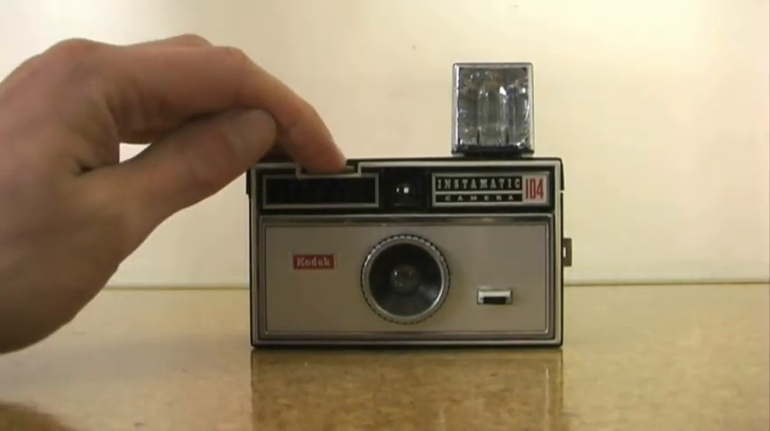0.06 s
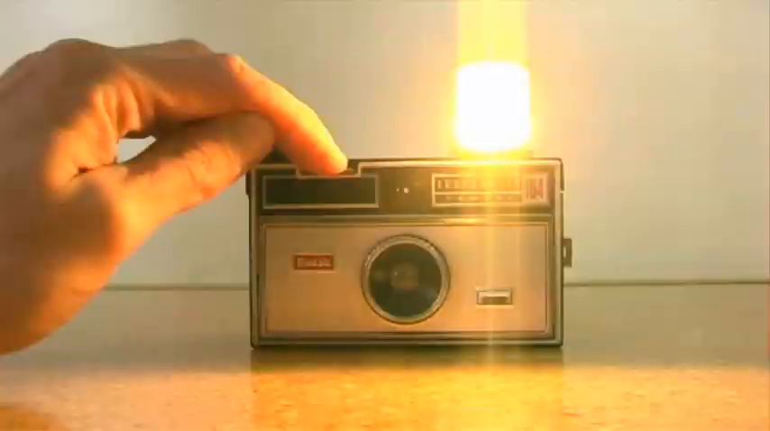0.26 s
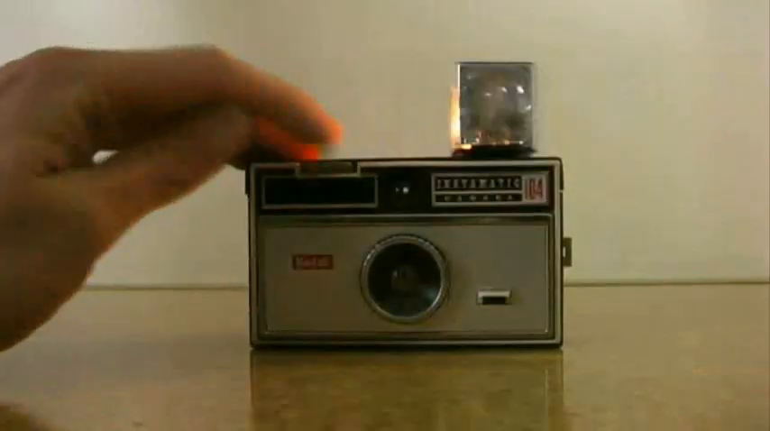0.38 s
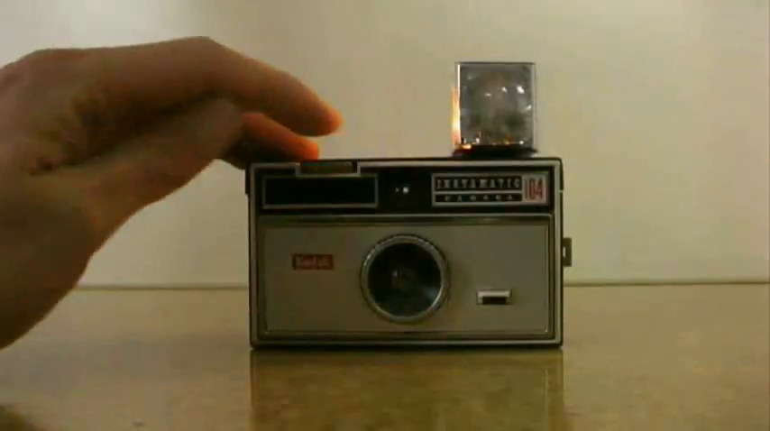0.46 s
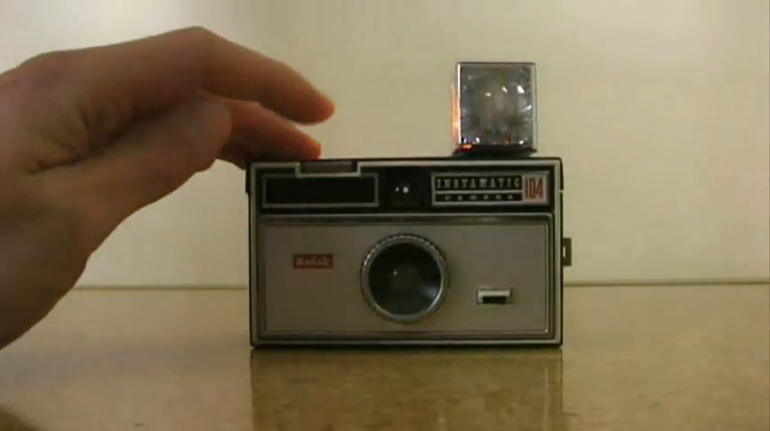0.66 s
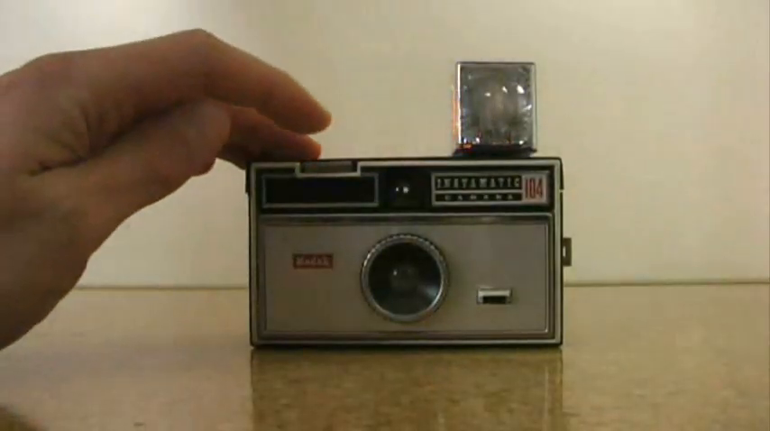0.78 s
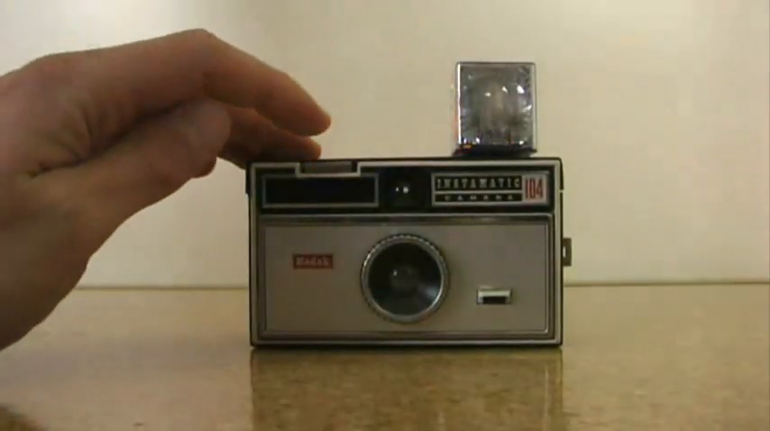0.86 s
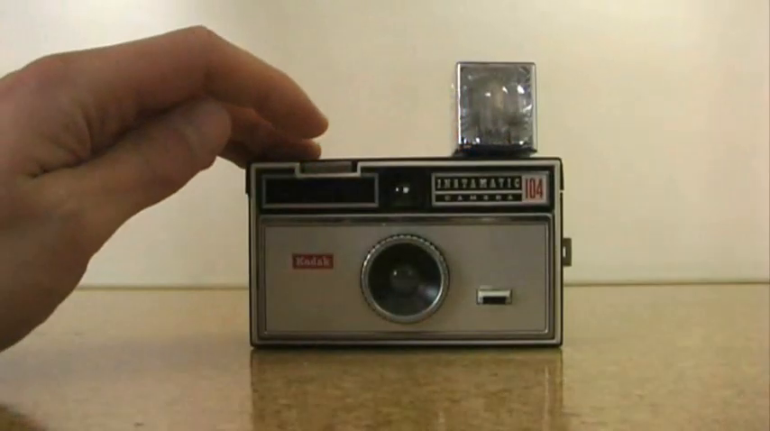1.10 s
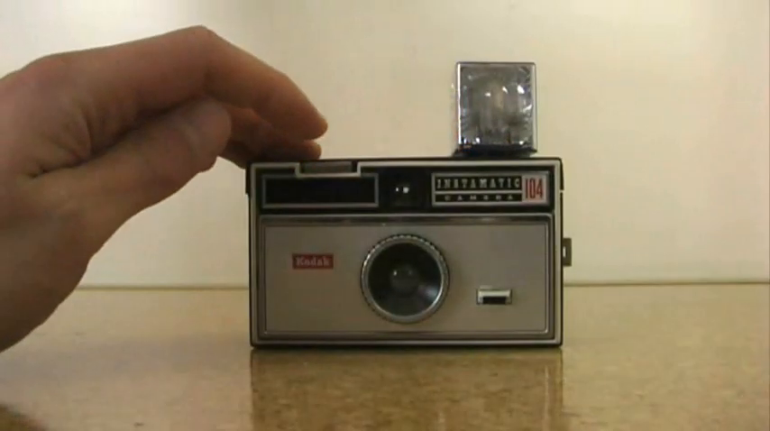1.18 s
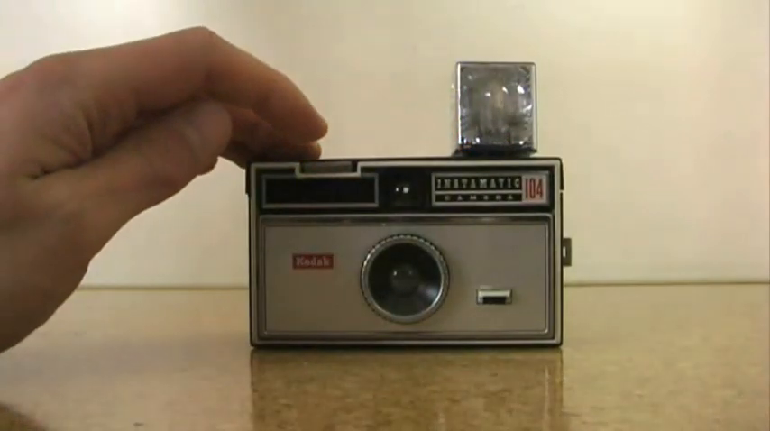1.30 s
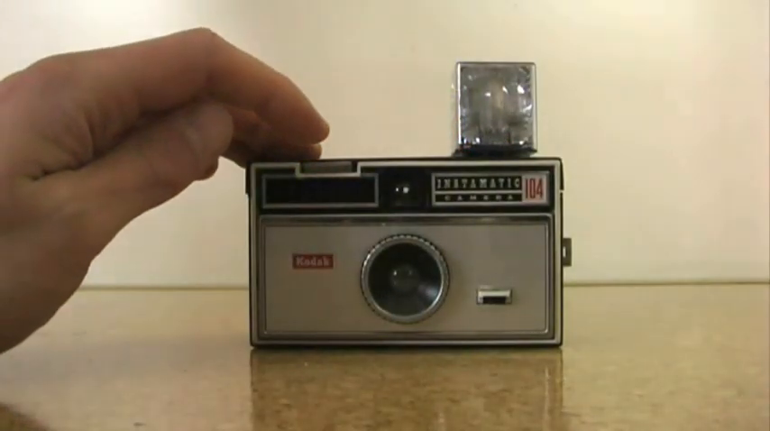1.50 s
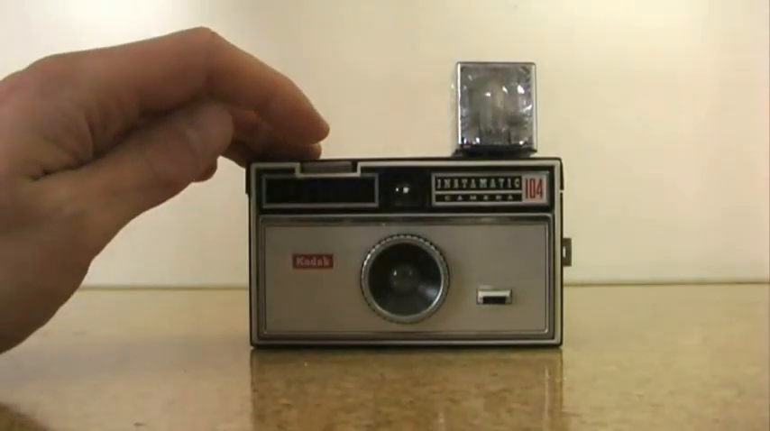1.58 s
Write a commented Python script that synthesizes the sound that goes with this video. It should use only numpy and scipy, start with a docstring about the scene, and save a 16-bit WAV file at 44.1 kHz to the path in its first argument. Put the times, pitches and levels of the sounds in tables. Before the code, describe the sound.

Two quick, sharp clicks of a small camera's shutter in a quiet room.

```python
"""A small plastic camera sits on a stone tabletop in a quiet room, close to the microphone.
First, fingers tick faintly on the case over a low hiss. Then the shutter snaps and a flashcube
fires with a soft puff. A fifth of a second later the release springs back with a ringing rattle.
Each snap thumps through the table and echoes in the room. Last come a few more ticks and a dull
knock as the hand nudges the camera."""
import sys
import numpy as np
from scipy import signal
from scipy.fft import rfft, irfft, next_fast_len
from scipy.io import wavfile

SR = 44100
rng = np.random.default_rng(int(sys.argv[2]) if len(sys.argv) > 2 else 0)


def digitize_waveform(pressure):
    """Quantize a signal to 16-bit integers and store it at the path in sys.argv[1].

    Rows of a 2-D input are taken as channels; values are limited to [-1, 1].
    """
    field = np.atleast_2d(pressure).T
    bounded = np.clip(field, -1, 1)
    quanta = np.round(bounded * 32767).astype(np.int16)
    wavfile.write(sys.argv[1], SR, quanta)


N = 72765
TIME = np.arange(N) / SR

# The blade's blows. Each row: peak time in seconds, level in dB, rise and fade in seconds, then bass,
# treble, ring and thump in dB. A rise or a fade is the time a sound takes to change by 60 dB.
SHUTTER_BLOWS = [(.2362, -5.5, 0.0053, 0.0097, -2.5, 3, -6.5, -33),
                 (.2452, -10, .011, 0.012, 4, 2.5, 0.5, -33.5),
                 (.2468, -9, 0.0049, 0.0086, -1, 0, -25, -42),
                 (.2659, -15.5, 0.014, 0.031, -45, -3, -8, -50)]
# The tone of those blows. Each row: frequency in Hz, level in dB.
SHUTTER_TONE = [(30, -36), (70, -27.5), (350, -16.5), (550, -6), (750, -12.5), (1100, -2.5), (1400, 2),
                (1900, -2), (2300, -7), (2900, -5), (3700, -9), (5200, -13), (7500, -12), (10400, -8),
                (12500, -13.5), (15800, -17)]
# The notes the shutter rings with. Each row: pitch in Hz, level in dB, fade in seconds.
SHUTTER_NOTES = [(565, -20, .08), (1058, -18, .05), (1315, -15, .06), (1420, -11, .05), (1750, -19, .04),
                 (1970, -22, .09), (2767, -25, .15), (3242, -26, .08), (10576, -22, .02)]

def shutter():
    """The shutter blade trips, hits its stop, bounces and closes."""
    return snap(SHUTTER_BLOWS, SHUTTER_TONE, SHUTTER_NOTES)


# The release's blows, tone and ringing notes. The rows read like those of the shutter's three tables.
RELEASE_BLOWS = [(0.4467, -12.5, 0.013, 0.033, 0.45, 1.5, 1, -33),
                 (0.4512, -13, 0.0031, .013, -1.7, 10.5, -32, -69),
                 (0.4726, -15, 0.022, 0.035, 1, 1.5, -26, -54),
                 (0.4786, -22, 0.012, 0.086, 1.1, 2, -2.5, -44)]
RELEASE_TONE = [(30, -54), (70, -17.5), (200, -15), (420, -12.5), (600, -17), (900, -11.5), (1380, -5.5),
                (1800, -5), (2500, -1.5), (3200, -5), (3900, -5.5), (4900, -12.5), (6200, -9.5),
                (7400, -17.5), (9300, -14), (12500, -21.5), (15800, -18.5)]
RELEASE_NOTES = [(1152, -32, .65), (1410, -15, .07), (1701, -16, .04), (1945, -19, .07), (2190, -18, .05),
                 (2485, -24, .18), (2760, -24, .22), (3062, -25, .28), (3165, -17, .18), (3232, -14, .11),
                 (3360, -16, .07), (4655, -20, .08), (5872, -22, .13), (6265, -20, .04)]

def release():
    """The release lever and the flashcube's socket spring back and rattle."""
    return snap(RELEASE_BLOWS, RELEASE_TONE, RELEASE_NOTES)


def snap(blows, tone, notes, bass_hz=1200, treble_hz=6000, case_db=-14, case_fade_s=0.063):
    """Each blow is a burst of tiny contacts; the loose case chatters on and the struck part rings."""
    contacts, ringing = np.zeros(N), np.zeros(N)
    for when, db, rise, fade, bass_db, treble_db, ring_db, _ in blows:
        chatter = from_db(case_db) * swell(when, rise, case_fade_s)
        burst = np.hypot(swell(when, rise, fade), chatter) * rng.choice([-1., 1.], N)
        tilt = [(bass_hz / 2, bass_db), (bass_hz * 2, 0), (treble_hz / 2, 0), (treble_hz * 2, treble_db)]
        contacts += from_db(db) * shape_tone(burst, tilt, keep_power=False)
        ringing += from_db(db + ring_db) * ring(when, notes)
    return shape_tone(contacts, tone) + ringing


# The spring's chirps. Each row: peak time in seconds, level in dB, pitch in Hz, rise and fade in seconds.
SPRING_CHIRPS = [(0.4484, -8.5, 3230, 0.01, 0.017), (0.4788, -19, 3120, 0.023, 0.027)]

def spring():
    """The spring gives two short, nearly pure chirps as it slides home."""
    return sum(from_db(db) * swell(when, rise, fade) * np.sin(2 * np.pi * hz * (TIME - when))
               for when, db, hz, rise, fade in SPRING_CHIRPS)


# The deep tone of a jolt. Each row: frequency in Hz, level in dB.
THUMP_TONE = [(25, -2), (60, -0.5), (110, 0), (210, 0), (330, -5), (700, -4.5), (1100, -23), (2200, -35)]

def table_thumps(blows, rise_s=0.0065, fade_s=0.034):
    """Each blow jolts the microphone through the table, more strongly on the right."""
    loudness = sum(from_db(thump_db) * swell(when, rise_s, fade_s) for when, *_, thump_db in blows)
    jolts = loudness * rng.choice([-1., 1.], (2, N))
    return shape_tone(jolts, THUMP_TONE) * from_db([[-4.5], [4.5]])


# The tone of the puff. Each row: frequency in Hz, level in dB.
FLASH_TONE = [(250, -50), (400, -7), (520, -1), (750, 0.5), (1100, 7.5), (1450, -12.5), (2200, -0.5),
              (6000, -44)]

def flash():
    """The bulb burns out with a soft puff that fades away."""
    puff = shape_tone(rng.standard_normal(N), FLASH_TONE)
    return from_db(-39.5) * swell(when=.262, rise=.03, fade=0.75) * puff


# Light taps. Each row: peak time in seconds, level in dB, pitch in Hz, rise and fade in seconds,
# bright edge in dB.
FINGER_TICKS = [(0.051, -44.5, 1460, 0.0024, 0.036, -9.5), (0.136, -46.5, 1480, 0.0046, 0.06, -5.5),
                (.219, -46.5, 1810, 0.014, 0.081, -5), (.440, -35.5, 1300, 0.0084, 0.11, -12),
                (0.7764, -46.5, 1500, .004, 0.025, 1), (1.216, -44, 865, .001, 0.068, -16),
                (1.31, -50.5, 980, 0.025, 0.062, -14), (1.530, -44, 1020, 0.0027, 0.072, -22),
                (1.551, -43, 1670, .005, 0.058, -11), (1.594, -44.5, 600, .001, 0.07, -20)]
# The notes of the knock. Each row: pitch in Hz, level in dB, fade in seconds.
KNOCK_NOTES = [(135, -51, 0.18), (226, -39, 0.089), (414, -52, .03), (2370, -43, 0.042)]

def fingers(edge_hz=11000, band_ratio=1.49):
    """Fingers and button tick on the case, and the hand nudges the camera with one dull knock."""
    out = ring(when=1.593, notes=KNOCK_NOTES)
    for when, db, hz, rise, fade, edge_db in FINGER_TICKS:
        noise = rng.standard_normal((2, N))
        body = unit_power(passband(noise[0], [hz / band_ratio, hz * band_ratio], "band"))
        edge = from_db(edge_db) * unit_power(passband(noise[1], edge_hz, "low"))
        out += from_db(db) * swell(when, rise, fade) * (body + edge)
    return out


# The tone of the echoes. Each row: frequency in Hz, level in dB.
ROOM_TONE = [(100, 0), (300, -6), (550, 5.5), (1200, 0), (2700, 2.5), (5000, 5), (9000, -3), (15000, -3.5)]
# How long they last. Each row: frequency in Hz, fade in seconds.
ROOM_FADE = [(200, 0.63), (550, 0.5), (1400, 0.56), (3000, 0.44), (6000, 0.4), (10000, 0.4), (15000, 0.42)]
# How wide they sound. Each row: frequency in Hz, level of the sides against the middle in dB.
ROOM_WIDTH = [(100, -11), (600, -14.5), (3000, -11), (7000, -10), (13000, -22)]

def room(sound, onset_s=0.01):
    """The room answers with a wash of echoes; each band of pitches dies away at its own speed."""
    edges_hz, tail = np.geomspace(60, 18000, 15), 0
    noise = rng.standard_normal((2, 2, N))
    for band, (low, high) in enumerate(zip(edges_hz, edges_hz[1:])):
        hz = np.sqrt(low * high)
        mid, side = passband(noise[band % 2], [low, high], "band")
        wash = stereo(mid, from_db(at_hz(ROOM_WIDTH, hz)) * side)
        loudness = from_db(at_hz(ROOM_TONE, hz)) * swell(onset_s, 2 * onset_s, at_hz(ROOM_FADE, hz))
        tail += loudness * wash
    return signal.fftconvolve(sound[None], unit_power(tail) / np.sqrt(N), axes=1)[:, :N]


# How the hand's rumble grows near the end. Each row: time in seconds, level in dB.
RUMBLE_LEVELS = [(0, -83), (1.3, -88), (1.44, -62), (1.53, -63), (1.65, -64)]
# Its tone. Each row: frequency in Hz, level in dB.
RUMBLE_TONE = [(25, -20), (50, -4), (110, -3), (230, -12.5), (600, -25.5), (2000, -42)]

def hand_rumble():
    """The shifting hand makes a low rumble."""
    level_db = np.interp(TIME, *np.transpose(RUMBLE_LEVELS))
    return from_db(level_db) * shape_tone(rng.standard_normal(N), RUMBLE_TONE)


# The tone of the hiss. Each row: frequency in Hz, level in dB.
HISS_TONE = [(15, -31.5), (25, -4), (69, -1.5), (164, -5.5), (253, -6), (313, -6), (349, -13.5),
             (445, -5.5), (567, -8), (703, -8), (782, -0.5), (945, -4.5), (1200, -7.5), (1660, -6.5),
             (2170, -9), (2850, -3), (4500, -14.5), (6730, -18), (7700, -14.5), (8350, -16), (15500, -23)]
# How wide it sounds. Each row: frequency in Hz, level of the sides against the middle in dB.
HISS_WIDTH = [(30, -9.5), (70, -13), (200, -3), (1000, -3.5), (4000, -5.5), (10000, -3.5)]
# Thin whines in the hiss. Each row: pitch in Hz, level in dB, width in Hz.
HISS_WHINES = [(935, -75, 48), (1679, -69.5, 71), (2900, -68.5, 21), (3160, -76, 190), (7840, -72, 400)]

def background(hiss_db=-57, hum_hz=146.6, hum_db=-71.5):
    """A steady hiss with a faint hum and whines."""
    mid, side = rng.standard_normal((2, N))
    side = shape_tone(side, HISS_WIDTH, keep_power=False)
    out = from_db(hiss_db) * shape_tone(stereo(mid, side), HISS_TONE)
    out += from_db(hum_db) * unit_power(np.sin(2 * np.pi * hum_hz * TIME))
    for hz, db, width in HISS_WHINES:
        whine = passband(rng.standard_normal(N + SR), [hz - width / 2, hz + width / 2], "band")
        out += from_db(db) * unit_power(whine[SR:])  # skip a second while the filter settles
    return out


def swell(when, rise, fade):
    """A loudness curve that climbs to its peak at `when`, then dies away."""
    return from_db(-60 * np.maximum((when - TIME) / rise, (TIME - when) / fade).clip(0, 5))


def ring(when, notes):
    """A struck part rings with pure notes that fade."""
    age = np.maximum(TIME - when, 0)
    return sum(from_db(db) * swell(when, 1, fade) * np.sin(2 * np.pi * hz * age)
               for hz, db, fade in notes)


def shape_tone(sound, tone, keep_power=True):
    """Filter a sound by a tone table; keep_power leaves white noise as strong as it was."""
    size = 2 * next_fast_len(N)
    gain = from_db(at_hz(tone, np.fft.rfftfreq(size, 1 / SR)))
    cepstrum = irfft(np.log(unit_power(gain) if keep_power else gain))
    # Fold the second half onto the first, so the filter never sounds ahead of a blow.
    cepstrum[1:size // 2] *= 2
    cepstrum[size // 2 + 1:] = 0
    return irfft(rfft(sound, size) * np.exp(rfft(cepstrum)))[..., :N]


def at_hz(table, hz):
    """Read between a table's rows, giving each octave equal space."""
    frequencies, values = np.transpose(table)
    return np.interp(np.log(np.maximum(hz, 1)), np.log(frequencies), values)


def passband(sound, hz, kind):
    """Let only some frequencies through."""
    return signal.sosfilt(signal.butter(2, hz, kind, fs=SR, output="sos"), sound)


def from_db(db):
    """Turn decibels into a multiplier."""
    return 10 ** (np.asarray(db) / 20)


def unit_power(sound):
    """Scale to an average power of one."""
    return sound / np.sqrt(np.mean(sound ** 2) + 1e-20)


def stereo(mid, side):
    """Make left and right from middle and sides."""
    return np.array([mid + side, mid - side])


def scene():
    """Two snaps with their thumps and echoes, the flash, the hand and the background."""
    click = shutter()
    rattle = release() + spring()
    echoes = room(from_db(-14) * click + from_db(-13) * rattle)
    close = click + rattle + table_thumps(SHUTTER_BLOWS + RELEASE_BLOWS) + flash() + fingers()
    around = echoes + background() + hand_rumble()
    return close + around * from_db([[-.4], [.4]])  # a touch louder on the right


def record(dry, cutoff_hz=15800):
    """The loudest peaks are clipped a little, and the highest treble is cut."""
    treble_cut = signal.ellip(10, .1, 80, cutoff_hz, fs=SR, output="sos")
    return signal.sosfilt(treble_cut, np.clip(dry, -.9, .9))


dry = scene()
out = record(dry)
digitize_waveform(out)
```